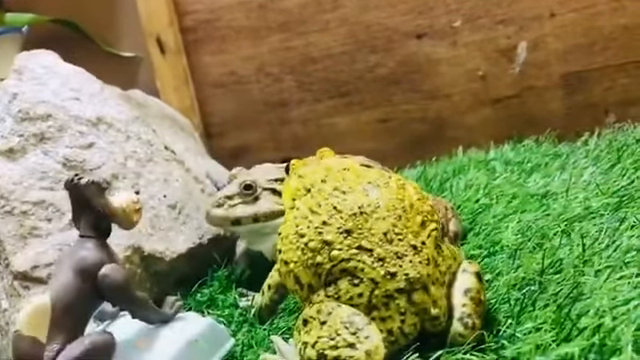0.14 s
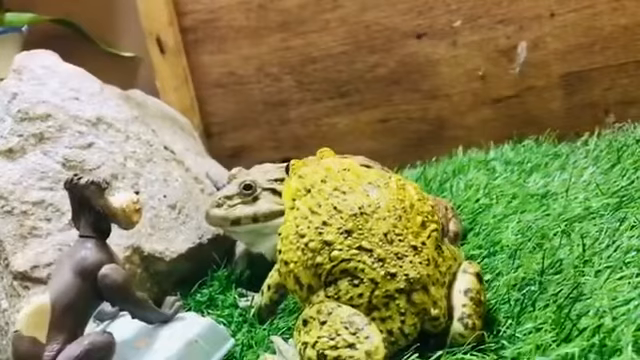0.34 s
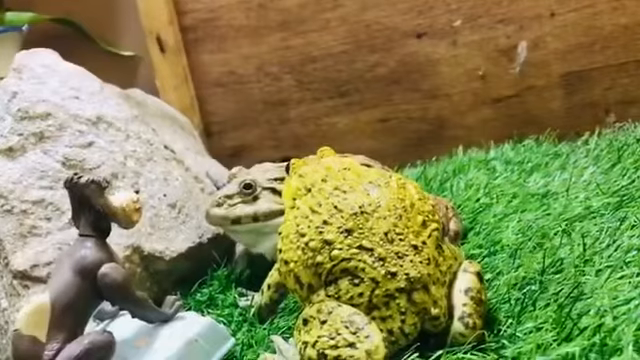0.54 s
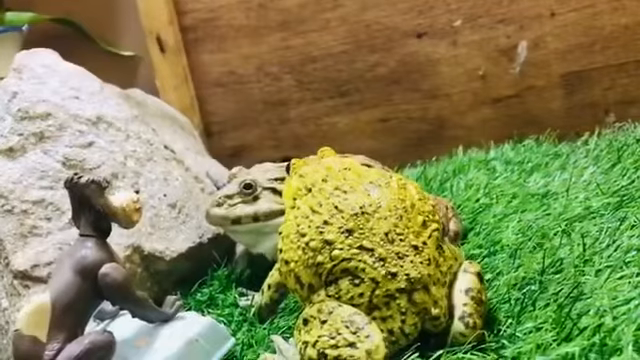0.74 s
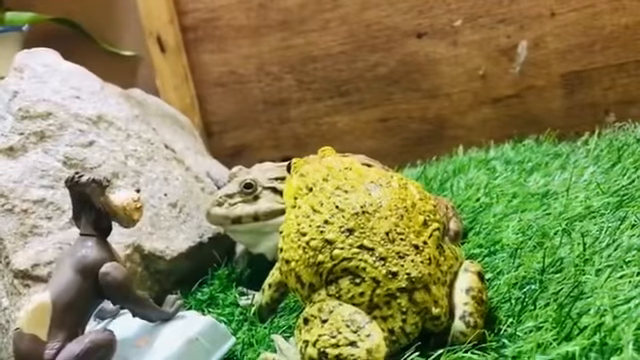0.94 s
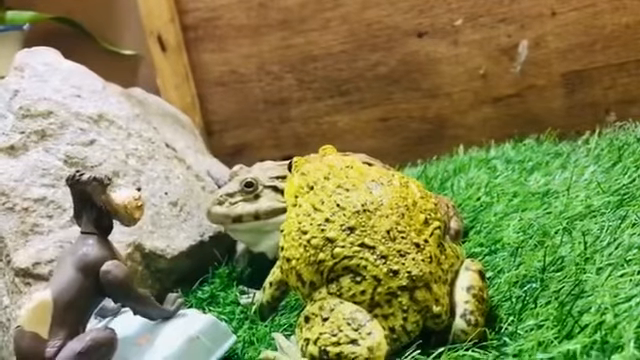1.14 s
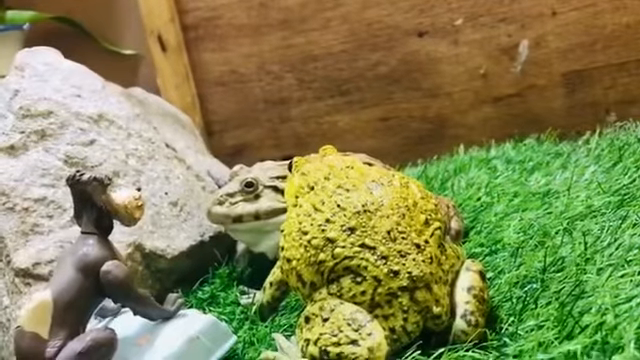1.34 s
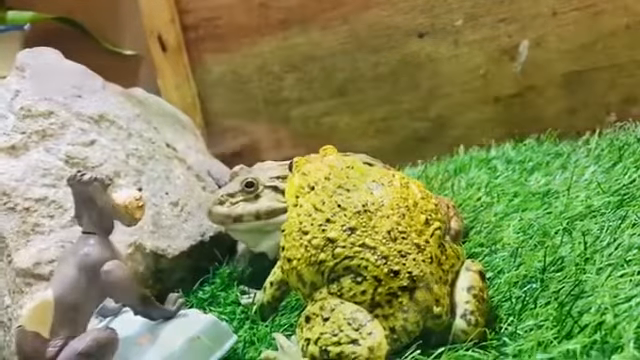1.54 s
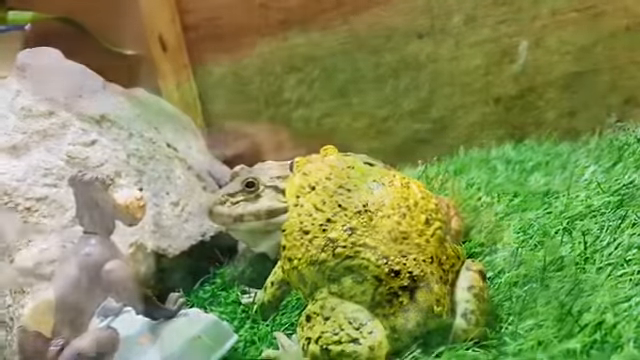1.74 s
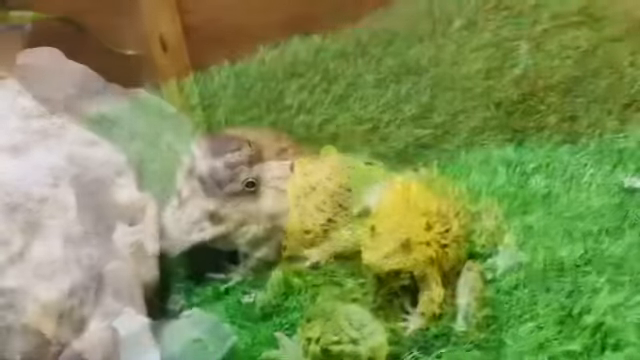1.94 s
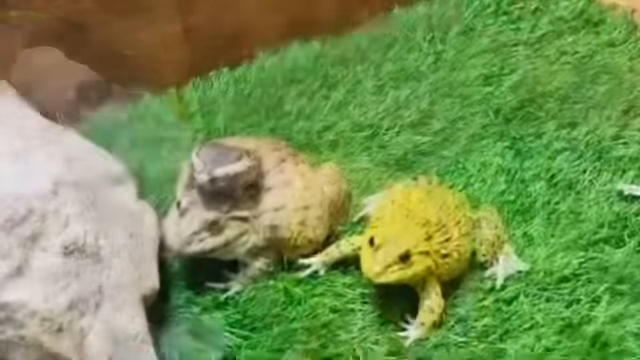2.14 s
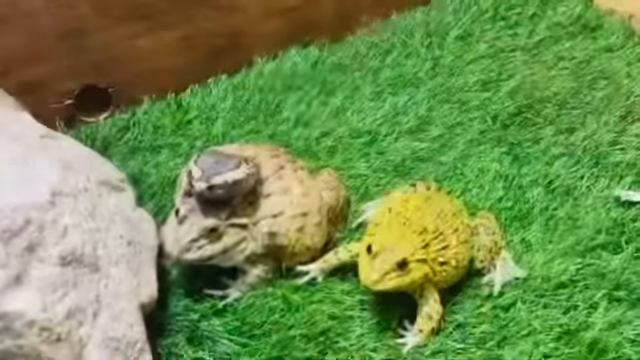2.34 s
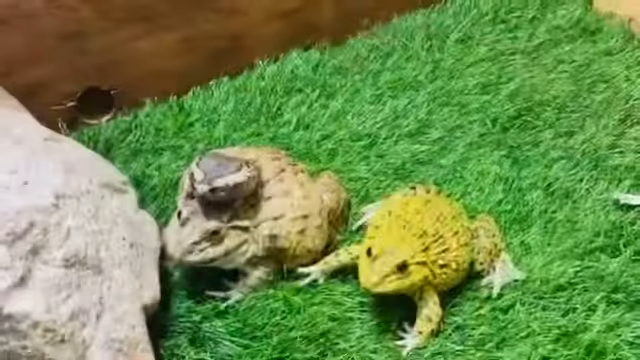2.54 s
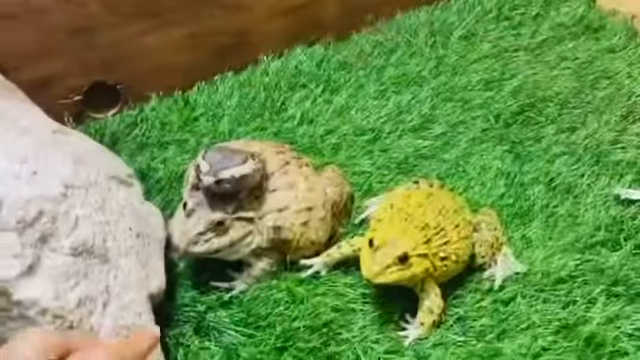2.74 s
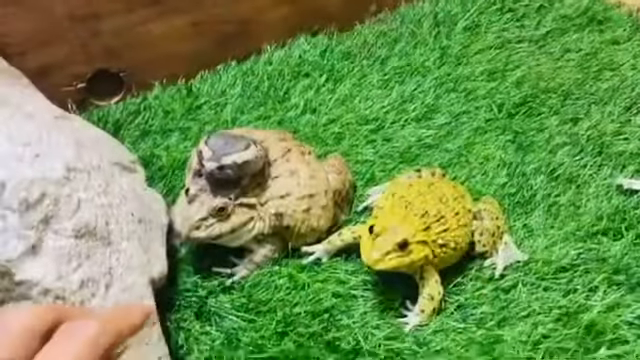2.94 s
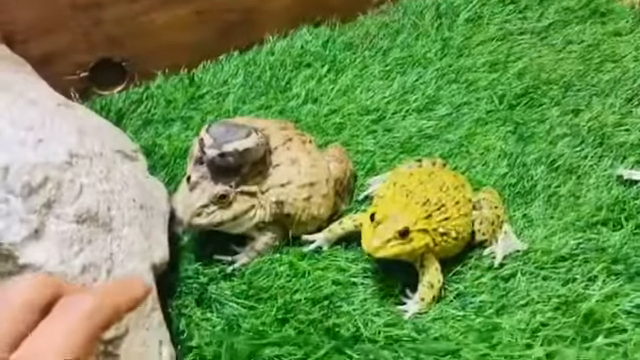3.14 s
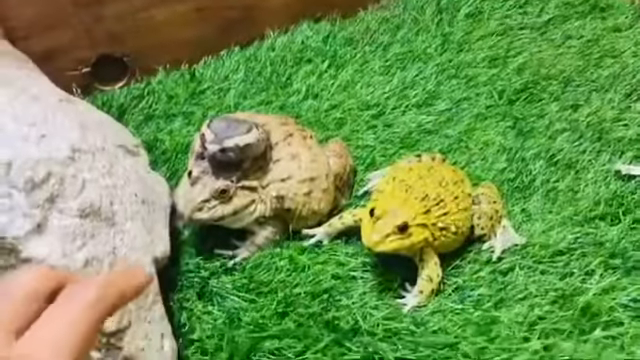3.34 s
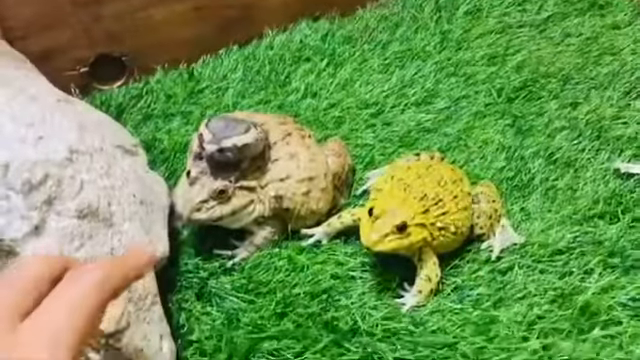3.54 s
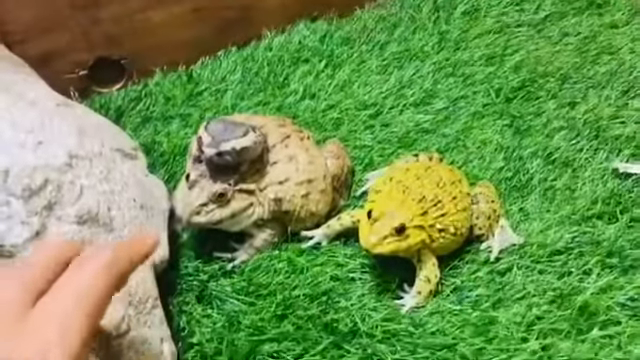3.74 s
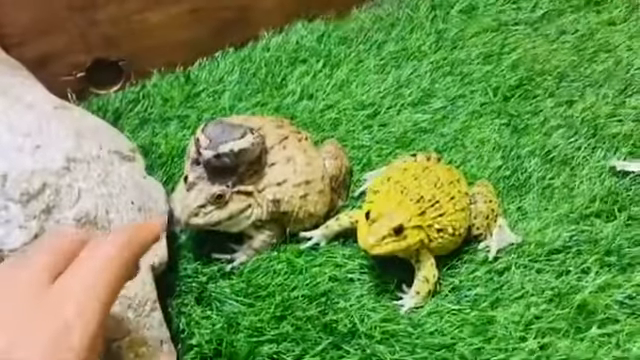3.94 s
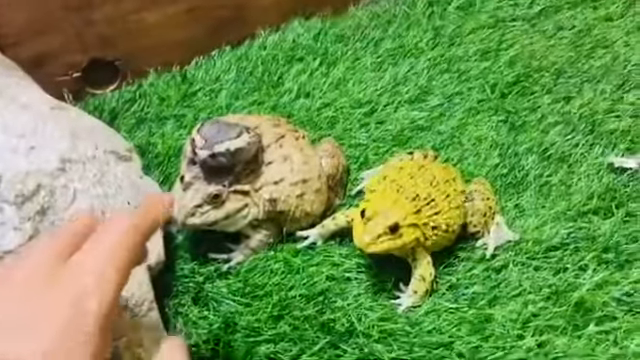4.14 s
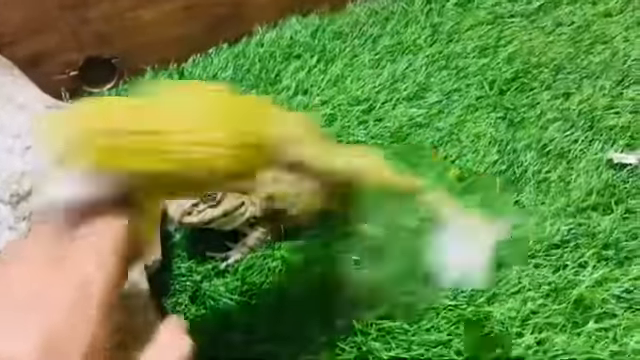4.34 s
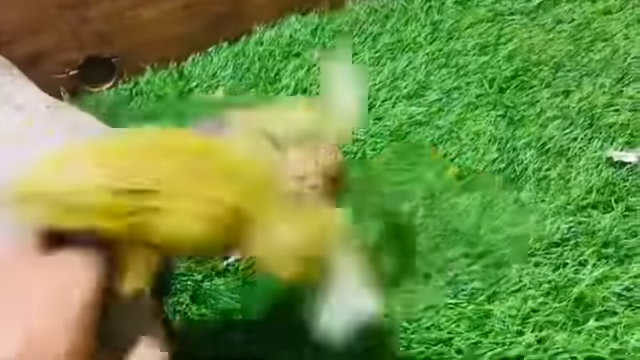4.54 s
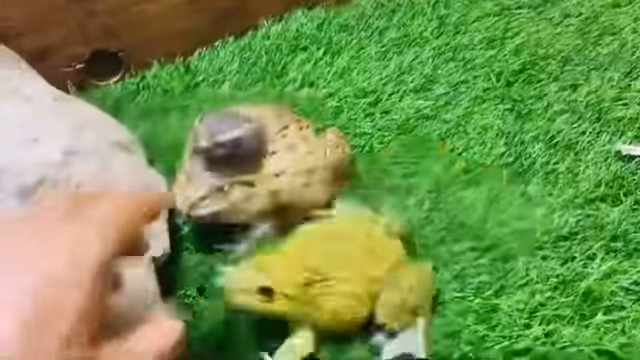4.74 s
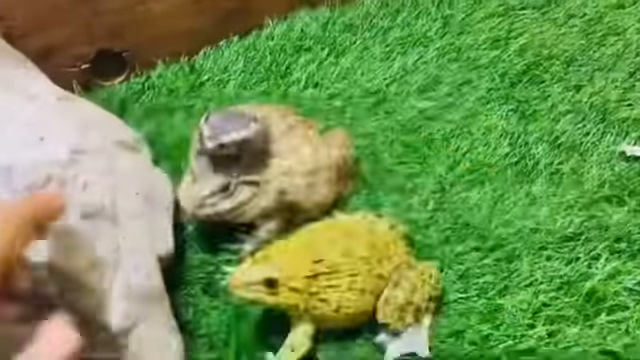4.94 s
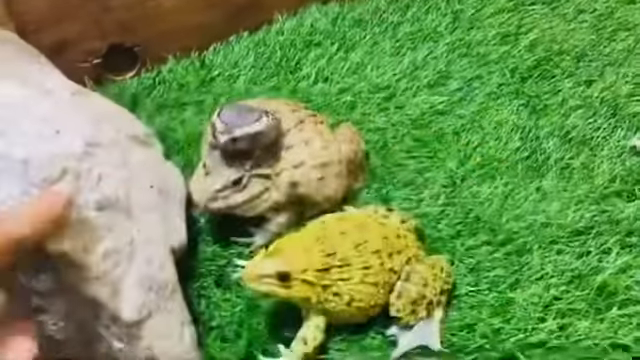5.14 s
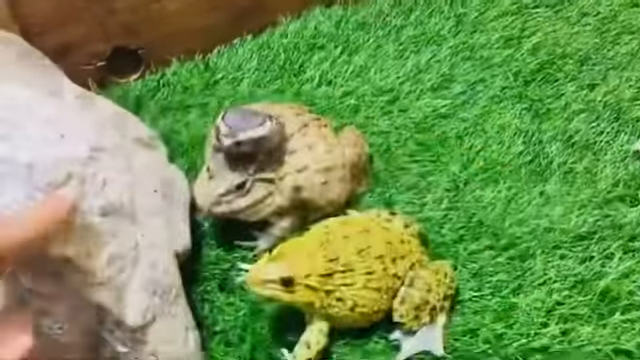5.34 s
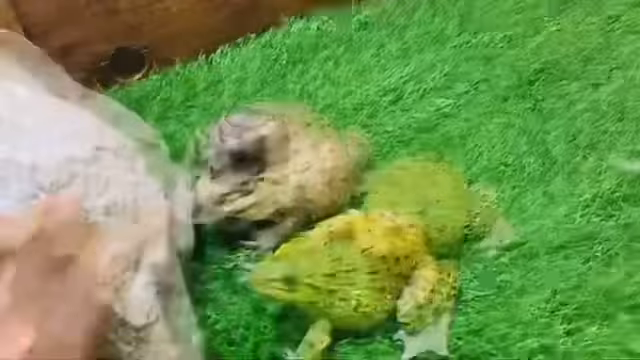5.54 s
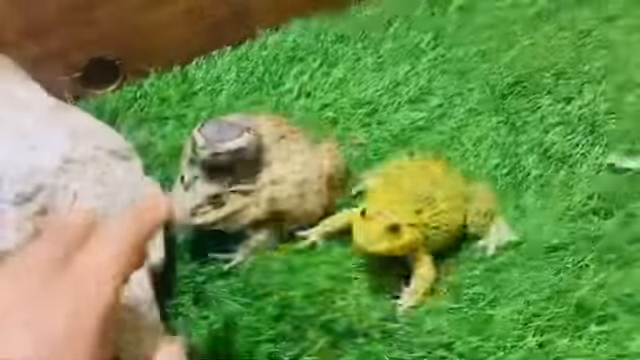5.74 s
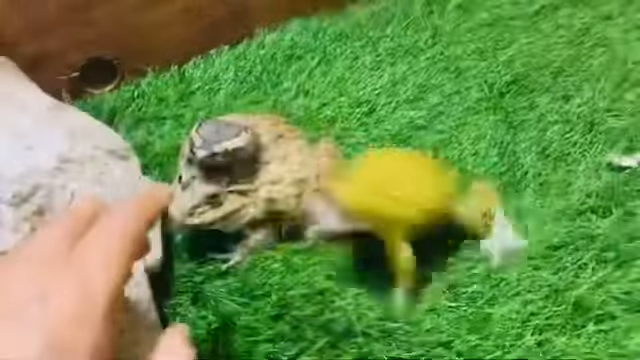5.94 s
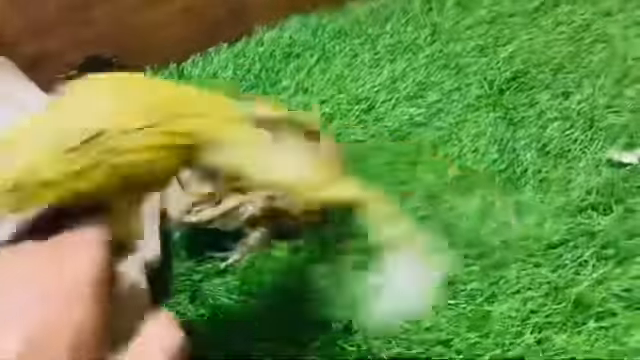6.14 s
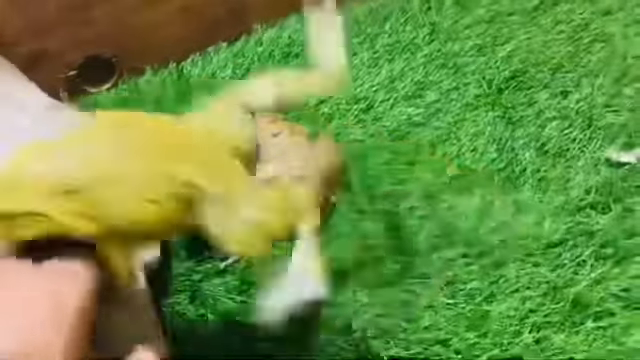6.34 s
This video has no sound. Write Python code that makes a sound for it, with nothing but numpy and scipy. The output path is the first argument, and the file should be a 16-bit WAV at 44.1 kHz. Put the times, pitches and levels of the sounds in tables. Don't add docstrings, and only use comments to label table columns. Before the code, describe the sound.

Soft slowed insect drone and airy hiss ending in a pop, then one loud falling frog squeal, rustling landing, and a longer, deeper repeat.

```python
import sys
import numpy as np
from scipy import signal
from scipy.fft import rfft, irfft
from scipy.io import wavfile
from scipy.ndimage import uniform_filter1d

SR = 44100
rng = np.random.default_rng(int(sys.argv[2]) if len(sys.argv) > 2 else 0)


def master_out(mix):
    frames = np.transpose(np.atleast_2d(mix))
    ceiling = np.clip(frames, -1, 1)
    pcm = np.round(ceiling * 32767).astype(np.int16)
    wavfile.write(sys.argv[1], SR, pcm)


def natural_amplitude(level_db):
    exponent = np.asarray(level_db, float) / 20
    return 10 ** exponent


N = 285584
MIC_TOP_HZ = 18700


def noise(n):
    return rng.standard_normal(n)


def rms_one(x):
    return x / np.sqrt(np.mean(x ** 2) + 1e-20)


def at_time(rows, t):
    s, *columns = np.transpose(rows)
    return [np.interp(t, s, c) for c in columns]


def at_hz(points, hz):
    table_hz, table_db = np.transpose(points)
    return np.interp(np.log(hz + 1), np.log(table_hz), table_db)


def resonate(x, hz, width):
    r = np.exp(-np.pi * width / SR)
    ring = [1, -2 * r * np.cos(2 * np.pi * hz / SR), r * r]
    return signal.lfilter([(1 - r * r) / 2, 0, (r * r - 1) / 2], ring, x)


def ringing_noise(n, hz, width):
    return rms_one(resonate(resonate(noise(n), hz, width), hz, width))


def drift(n, rate):
    r = np.exp(-2 * np.pi * rate / SR)
    return rms_one(signal.lfilter([1], [1, -2 * r, r * r], noise(n + SR))[SR:])


def coloured(n, spectrum):
    hz = np.arange(n // 2 + 1) * SR / n
    gain = natural_amplitude(at_hz(spectrum, hz)) * (hz > spectrum[0][0] / 2)
    return rms_one(irfft(rfft(noise(n)) * gain, n))


def bursts(rows, t, trill_hz, depth):
    out = np.zeros(len(t))
    natural_s = np.arange(len(t)) / SR
    for s, length, hz, width, db in rows:
        hump = np.sqrt(np.sin(np.pi * np.clip((t - s) / length, 0, 1)) + 1e-12)
        on = slice(*np.flatnonzero(hump > 1e-3)[[0, -1]])
        tone = np.resize(ringing_noise(SR // 2, hz, width), len(t))[:len(hump[on])]
        trill = 1 + depth * np.sin(2 * np.pi * trill_hz * natural_s[on])
        out[on] += natural_amplitude(db) * hump[on] * tone * trill
    return out


def scream(t):
    # start_s, pitch_hz, effort_db
    voice_path = [
        (4.232, 698, -22.5),
        (4.2415, 1145, -28),
        (4.2455, 1365, -16.5),
        (4.255, 1594, -23.5),
        (4.272, 1669, -20),
        (4.312, 1476, -23),
        (4.350, 1338, -23.5),
        (4.362, 1173, -25),
        (4.372, 680, -50),
    ]
    # pitch_hz, level_db
    throat = [(700, -3), (1600, 0.5), (3200, 5.5), (4500, 6), (6000, -4), (7300, 2), (8200, -2),
              (9000, -0.5), (9900, 0), (10500, -7.5), (11750, 2.5), (13200, -4.5), (15000, -8.5),
              (18200, -24)]
    # open_db, gain_db_per_s as breath runs out, extra_db while the jaw moves
    low_partials = [(-4, 56, -6), (1, 47, -1.5), (-4, 10, 11)]
    # start_s, length_s, pitch_hz, width_hz, level_db
    intake = [
        (4.217, 0.02, 4200, 899, -60),
        (4.222, 0.035, 8176, 5146, -53),
    ]
    # start_s, length_s, pitch_hz, width_hz, level_db
    rasp = [
        (4.239, .01, 3600, 1600, -26.5),
        (4.348, .04, 2400, 1000, -37),
        (4.34, .045, 3750, 700, -32),
        (4.364, .02, 620, 180, -43.5),
    ]
    first_s, last_s = voice_path[0][0], voice_path[-1][0]
    attack_s, jaw_s = .006, .005
    opens_s, opening_s, shuts_s, shutting_s = 4.2435, .003, 4.3655, .002

    pitch, effort_db = at_time(voice_path, t)
    since = t - opens_s
    shut = 1 - .5 * (np.tanh(since / opening_s) - np.tanh((t - shuts_s) / shutting_s))
    dull = 1.88 - 22.5 * shut - 39 * np.clip(since, 0, 1)
    effort_db = effort_db - 2 * shut
    pitch = uniform_filter1d(pitch, size=200) * (1 + 0.0032 * drift(N, 140))
    phase = 2 * np.pi * np.cumsum(pitch) / SR

    on = (t > first_s - attack_s) & (t < last_s)
    k = np.arange(1, 26)[:, None]
    overtone_hz = k * pitch[on]
    jaw = np.exp(-(since[on] / jaw_s) ** 2)
    level_db = at_hz(throat, overtone_hz) + dull[on] * np.log2(k)
    level_db += -14 * np.exp(-((overtone_hz - 2740) / 80) ** 2)
    level_db[:3] += [(db + gain_db * since[on]) * (1 - shut[on]) + jaw_db * jaw
                     for db, gain_db, jaw_db in low_partials]
    level_db[2:] += [3.2 * drift(SR // 4, 90)[:on.sum()] for _ in k[2:]]
    lag = 1.1 * rng.standard_normal(k.shape)
    overtones = natural_amplitude(level_db) * np.cos(k * phase[on] - lag) * (overtone_hz < MIC_TOP_HZ)
    voice = np.zeros(N)
    voice[on] = -np.sum(overtones, axis=0)

    high_pass = signal.butter(4, 3800, "high", fs=SR, output="sos")
    airy = signal.sosfilt(high_pass, coloured(N, throat))
    breath = natural_amplitude(-11 + 3.4 * dull) * airy * (1 + 0.48 * np.cos(phase)) * on
    catch = np.clip((t - first_s) / attack_s + 1, 0, 1) ** 2
    return catch * natural_amplitude(effort_db) * (voice + breath) + bursts(intake + rasp, t, trill_hz=200, depth=0.19)


def room(x):
    # late_s, level_db
    wall_echoes = [
        (.0047, -16),
        (.0083, -15.5),
        (0.0114, -15),
    ]
    # pitch_hz, level_db
    pen_colour = [(500, -8.5), (2000, -7.5), (3500, -10.5), (6000, -3), (16000, 2.5)]
    # pitch_hz, fall_s
    tail_fall = [(500, 0.29), (1200, 0.85), (3000, 0.73), (7500, 0.88), (15000, 0.2)]
    pen_db, pen_fall_s, tail_db = -26, 0.18, -44.5

    t = np.arange(SR) / SR
    answer = natural_amplitude(pen_db - 60 * t / pen_fall_s) * coloured(SR, pen_colour) * np.clip(t / 0.0018, 0, 1)
    band_edges = 300 * 2 ** np.arange(0, 6.1, .5)
    for low, high in zip(band_edges, band_edges[1:]):
        band_pass = signal.butter(2, [low, high], "band", fs=SR, output="sos")
        band = signal.sosfilt(band_pass, noise(SR))
        fall_s = at_hz(tail_fall, np.sqrt(low * high))
        answer += natural_amplitude(tail_db - 60 * t / fall_s) * band * np.clip(t / 0.026, 0, 1)
    answer[0] = 1
    for late, db in wall_echoes:
        answer += natural_amplitude(db) * np.clip(1 - np.abs(t - late) * SR, 0, 1)
    return signal.fftconvolve(x, answer)[:len(x)]


def turf(t):
    # start_s, length_s, pitch_hz, width_hz, level_db
    rustles = [
        (1.35, .12, 11300, 2000, -61),
        (1.56, 0.079, 10500, 1500, -65),
        (1.87, 0.034, 10250, 400, -68),
        (2.78, .16, 12200, 2500, -74),
        (4.03, 0.27, 11800, 4000, -69),
    ]
    # start_s, length_s, pitch_hz, width_hz, level_db
    leap = [
        (4.425, 0.12, 12500, 5030, -51),
        (4.531, .11, 11440, 5960, -50),
        (4.553, 0.12, 5800, 4060, -47.5),
        (4.659, 0.038, 8800, 9020, -52.5),
        (4.67, .03, 450, 504, -62),
        (4.626, 0.17, 9100, 9300, -60),
        (4.773, 0.043, 9960, 502, -66),
    ]
    return bursts(rustles + leap, t, trill_hz=89, depth=.3)


def ticks(rows, t):
    clicks = np.zeros(len(t))
    for s, db in rows:
        clicks[np.searchsorted(t, s)] = natural_amplitude(db + 24.0)
    out = np.zeros(len(t))
    for hz, width, share in [(11300, 2400, 1), (13900, 1800, .4), (16500, 2400, .35)]:
        out += share * resonate(resonate(clicks, hz, width), hz, width)
    return out


def rush(t):
    # start_s, level_db
    swell = [
        (1.765, -100),
        (1.775, -70.5),
        (2.3, -62),
        (2.8, -63),
        (3.2, -63.5),
        (3.46, -62.5),
        (3.468, -100),
    ]
    # pitch_hz, level_db (per Hz)
    hiss_colour = [(150, -7.5), (200, -5.5), (280, 2.5), (370, -9), (900, -2), (2200, -11), (4000, -15.5),
                   (6000, -29.5), (9000, -45.5)]
    since = np.clip(t - 3.4666, 0, 1)
    pop_hz = (170 + 1300 * np.exp(-since / 0.00084)) * (since > 0)
    phase = 2 * np.pi * np.cumsum(pop_hz) / SR
    pop = natural_amplitude(-41) * np.sin(phase) * np.exp(-(since / 0.0058) ** 2)
    return natural_amplitude(at_time(swell, t)[0]) * coloured(N, hiss_colour) + pop


def throb(t, db, spells):
    for s, length, rate, swing_db in spells:
        spell = np.cos(np.pi * np.clip((t - s) / length, -.5, .5))
        db = db + swing_db * spell * np.cos(2 * np.pi * rate * (t - s))
    return db


def insects(n, chorus_db):
    # pitch_hz, width_hz, level_db
    wing_tones = [
        (8197, 570, 1),
        (8746, 390, -1.5),
        (7175, 410, -7),
    ]
    pulse = 1 + 0.23 * np.sin(2 * np.pi * np.cumsum(240 + 15 * drift(n, 2)) / SR)
    wings = sum(natural_amplitude(db) * ringing_noise(n, hz, width) for hz, width, db in wing_tones)
    return natural_amplitude(chorus_db) * pulse * wings


def motor(t, load, rumble_db):
    n = len(t)
    hum_db, = at_time(load, t)
    hum = rms_one(resonate(resonate(noise(n), 108, 8.2), 108, 14))
    rumble = rms_one(resonate(resonate(noise(n), 45, 22), 52, 30))
    return natural_amplitude(hum_db) * hum + natural_amplitude(rumble_db) * rumble


def surroundings(t, chorus_db, callers, load, rumble_db, air_db):
    # pitch_hz, level_db (per Hz)
    air_colour = [(80, -13.5), (150, -26.5), (280, -25), (1200, -37), (2700, -39), (5400, -44),
                  (10000, -44), (15000, -48.5), (18000, -45.5)]
    far = bursts(callers, t, trill_hz=68.14, depth=0.31)
    air = natural_amplitude(air_db) * coloured(len(t), air_colour)
    return insects(len(t), chorus_db) + far + motor(t, load, rumble_db) + air


def natural_stretch(t):
    # start_s, level_db (peak)
    snaps = [
        (3.558, -47),
        (3.5635, -37.5),
    ]
    # start_s, length_s, pitch_hz, width_hz, level_db
    far_calls = [
        (3.93, 0.17, 3110, 170, -74),
        (5.28, .2, 3230, 170, -70),
        (5.199, .1, 2650, 200, -72),
        (1.85, 0.23, 5500, 60, -84),
        (3.1, 0.45, 5490, 50, -79),
        (3.08, .1, 12250, 60, -80),
        (4.8, 0.71, 1797, 40, -82),
    ]
    # length_s, pitch_hz, width_hz, level_db
    repeated_call = (.21, 3225, 170, -69.5)
    # strongest_s, length_s, throbs_per_s (0 for one swell), swing_db
    in_step = [
        (1.75, .9, 7.1, 5),
        (2.83, .7, 6.9, 2),
        (3.345, .9, 6.8, -4),
        (3.995, .7, 6.8, 2.5),
        (5.19, 1.3, 7.1, 2.5),
        (5.1, 1.5, 0, 3),
    ]
    # start_s, level_db
    engine_load = [
        (1.6, -65),
        (1.84, -66),
        (1.9, -54),
        (2.6, -57),
        (3.4, -55),
        (3.9, -61),
        (4.299, -74.5),
        (4.85, -59.5),
        (5.4, -65),
    ]
    # start_s, level_db
    ducking = [
        (4.243, 0),
        (4.25, -4),
        (4.6, 1),
        (4.85, -1.5),
    ]

    overload = 1.3
    near = overload * np.tanh(room(scream(t) + ticks(snaps, t)) / overload)
    near = signal.sosfilt(signal.butter(2, 260, "high", fs=SR, output="sos"), near)
    trills = [(1.68 + k * .699, *repeated_call) for k in range(6)]
    around = surroundings(t, throb(t, -70.5, in_step), trills + far_calls, engine_load,
                          rumble_db=-55, air_db=-61.5)
    return near + around * natural_amplitude(at_time(ducking, t)[0]) + turf(t)


def slowed(x, up, down):
    mic_filter = signal.cheby2(20, 70, MIC_TOP_HZ, fs=SR, output="sos")
    passed = signal.sosfilt(mic_filter, x)
    smooth = signal.firwin(241, .95 / up, window=("kaiser", 9))
    return signal.resample_poly(passed, up, down, window=smooth)


def slow_opening(t):
    # start_s, level_db (peak)
    slow_snaps = [
        (0.1661, -64),
        (0.203, -64),
        (0.2603, -72),
        (0.5766, -65),
        (0.8789, -65),
        (1.18, -64),
        (1.2511, -68),
        (1.28, -71),
    ]
    # start_s, length_s, pitch_hz, width_hz, level_db
    slow_calls = [
        (-.3, .56, 3000, 45, -66),
        (.36, .68, 3240, 55, -65),
        (1.0, .3, 3100, 80, -79),
        (1.64, .2, 3000, 70, -70),
        (.1, 1.2, 3950, 200, -82),
        (.2, .25, 2950, 60, -79),
    ]
    # strongest_s, length_s, throbs_per_s, swing_db
    slow_in_step = [
        (.81, 4.0, 2.45, 3),
    ]
    # start_s, level_db
    slow_load = [
        (0.15, -63),
        (.55, -76),
        (.9, -61),
        (1.25, -72),
        (1.48, -55),
        (1.8, -78),
    ]
    third = 3 * t[:N // 3 + 1]
    around = surroundings(third, throb(third, -67.5, slow_in_step), slow_calls, slow_load,
                          rumble_db=-51, air_db=-63.5)
    return slowed(around + room(ticks(slow_snaps, third)), 3, 1)[:N]


def scene():
    # start_s, share of the later stretch
    fade_in = [
        (1.33, 0.009),
        (2.3, 1),
    ]
    fade_out = [
        (5.28, 0),
        (5.88, 0.86),
    ]
    replay_from_s, replay_at_s = 3.8, 5.25593
    t = np.arange(N) / SR
    natural = natural_stretch(t)
    opening = slow_opening(t)
    start = round(replay_at_s * SR)
    replay = np.zeros(N)
    replay[start:] = slowed(natural[round(replay_from_s * SR):], 3, 2)[:N - start]
    came, went = at_time(fade_in, t)[0], at_time(fade_out, t)[0]
    mix = (1 - came) * opening + came * (1 - went) * natural + went * natural_amplitude(1.67) * replay
    return (mix + rush(t))[None]


def band_limit(x):
    return signal.sosfilt(signal.butter(12, 15660, fs=SR, output="sos"), x)


def record(dry):
    low_pass = signal.cheby2(16, 60, 15450, fs=SR, output="sos")
    cut = signal.sosfilt(low_pass, dry)
    return band_limit(np.clip(cut, -1, 1))


dry = scene()
out = record(dry)
master_out(out)
```